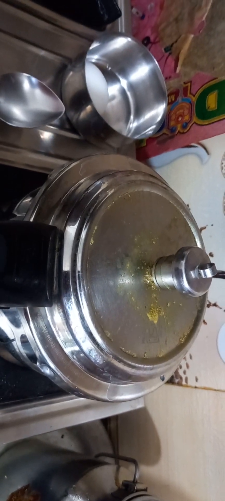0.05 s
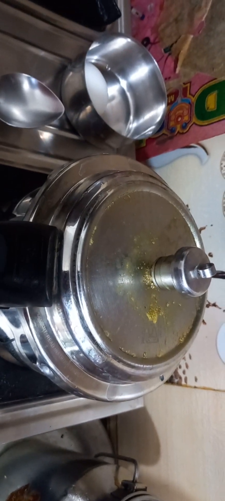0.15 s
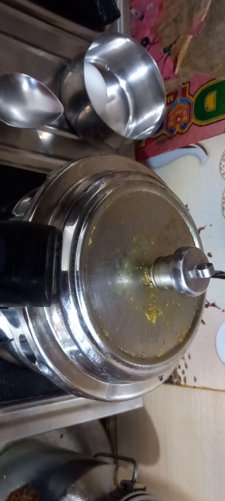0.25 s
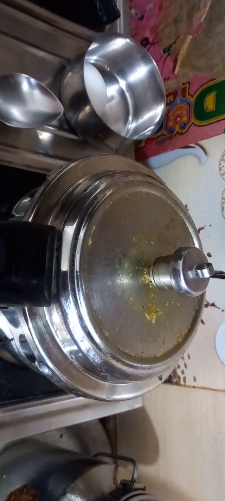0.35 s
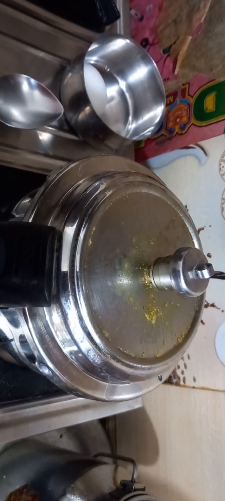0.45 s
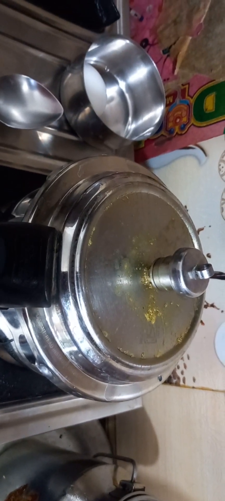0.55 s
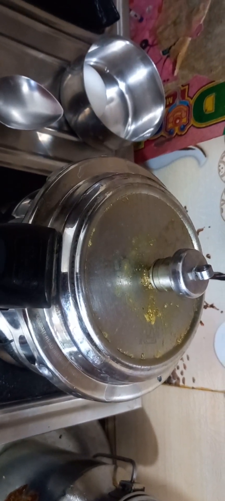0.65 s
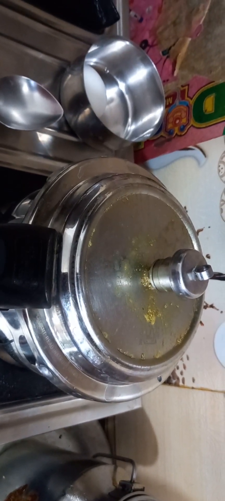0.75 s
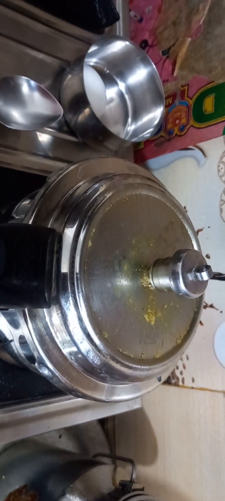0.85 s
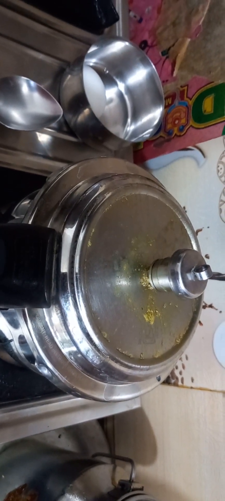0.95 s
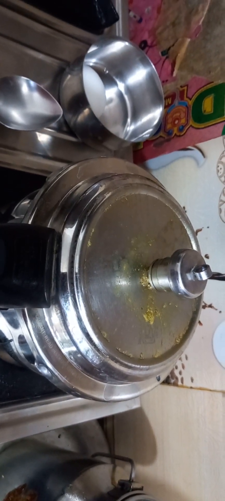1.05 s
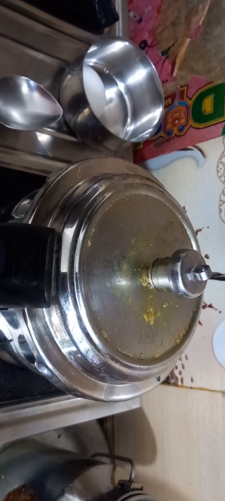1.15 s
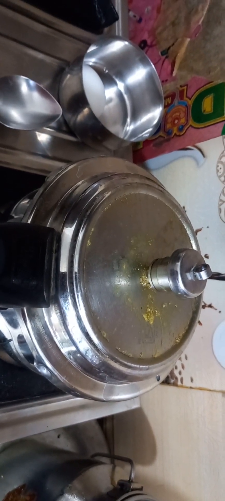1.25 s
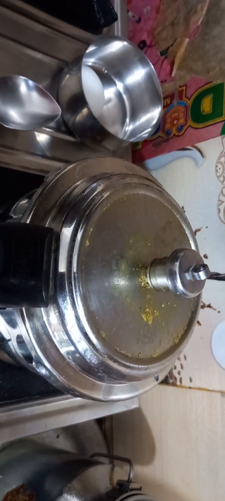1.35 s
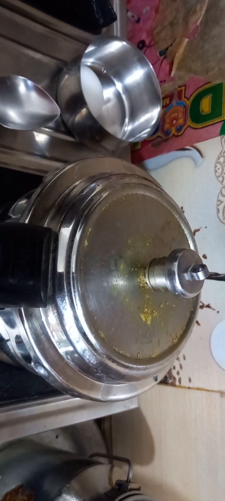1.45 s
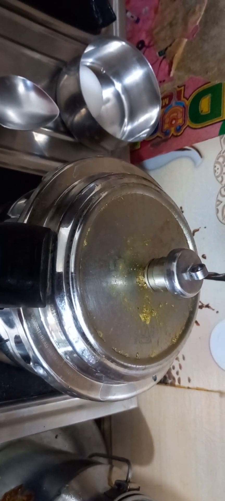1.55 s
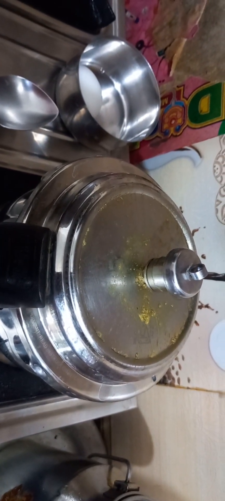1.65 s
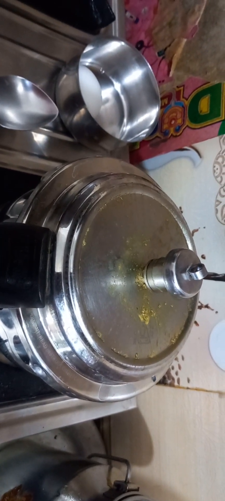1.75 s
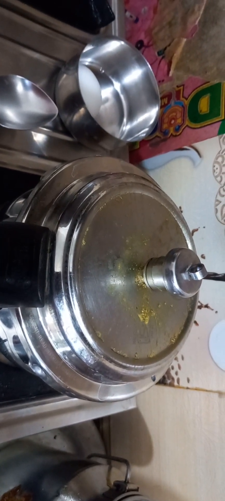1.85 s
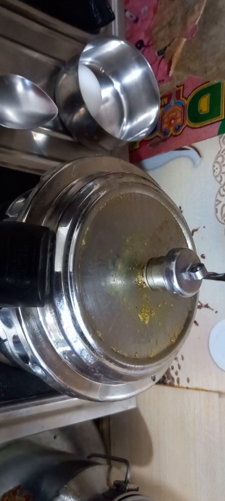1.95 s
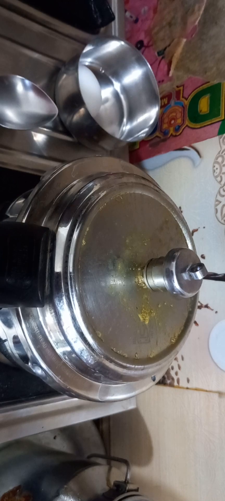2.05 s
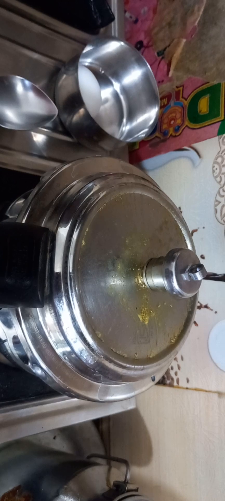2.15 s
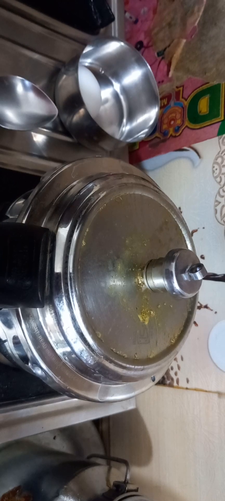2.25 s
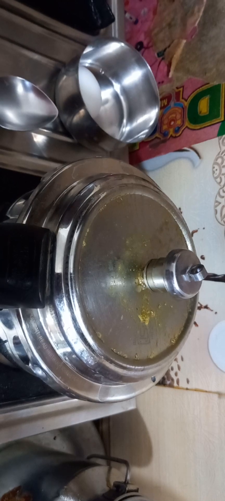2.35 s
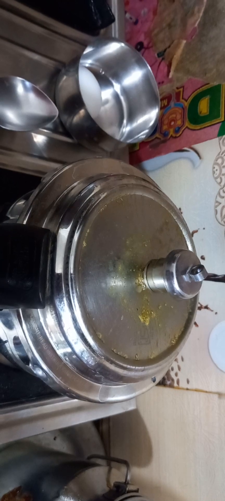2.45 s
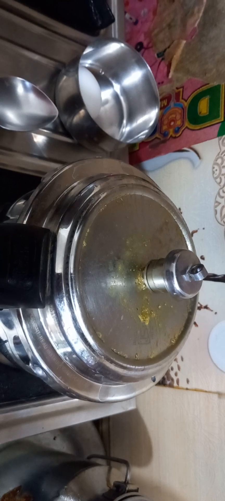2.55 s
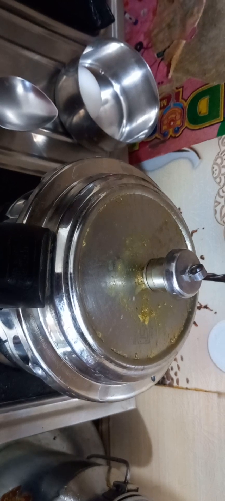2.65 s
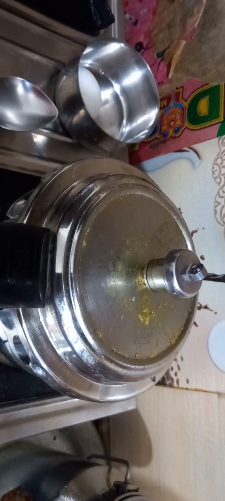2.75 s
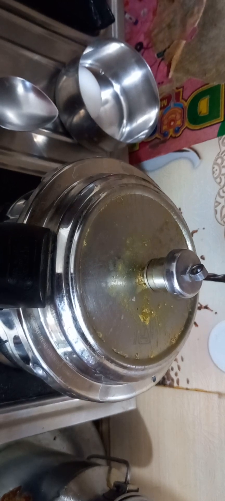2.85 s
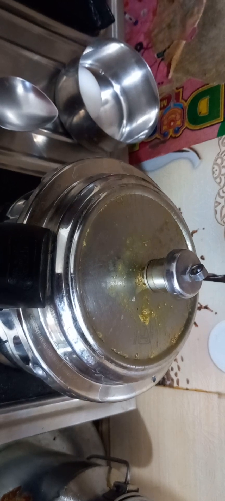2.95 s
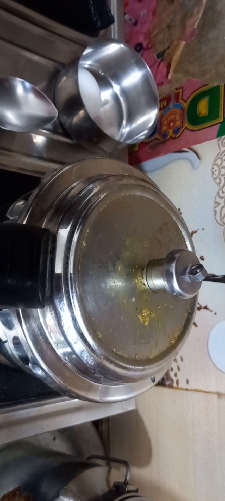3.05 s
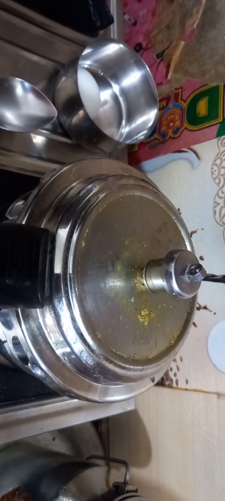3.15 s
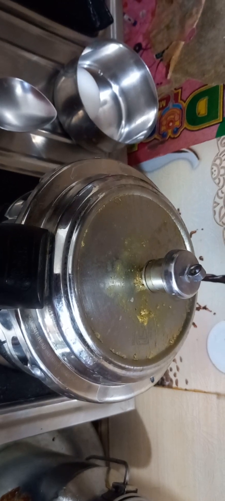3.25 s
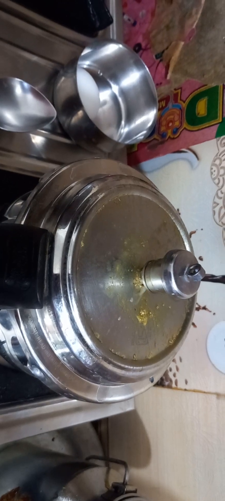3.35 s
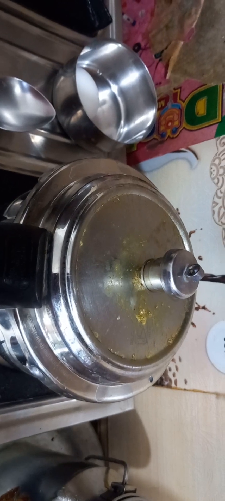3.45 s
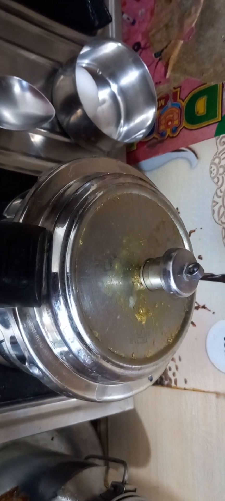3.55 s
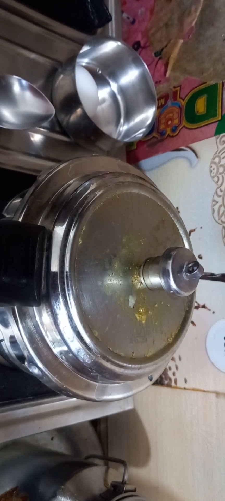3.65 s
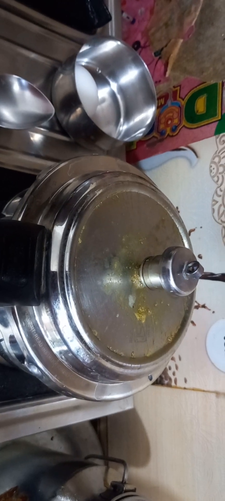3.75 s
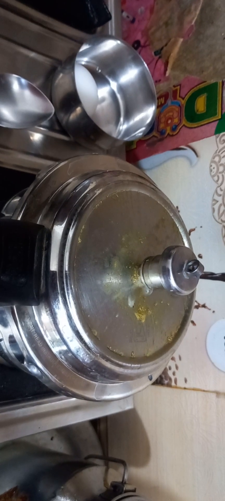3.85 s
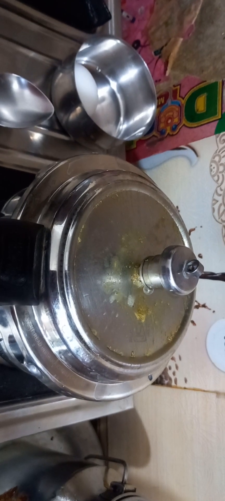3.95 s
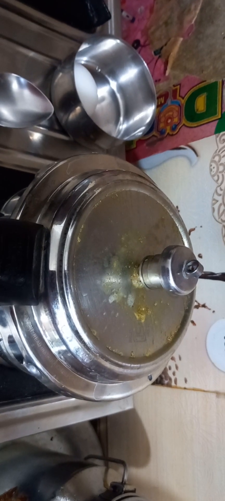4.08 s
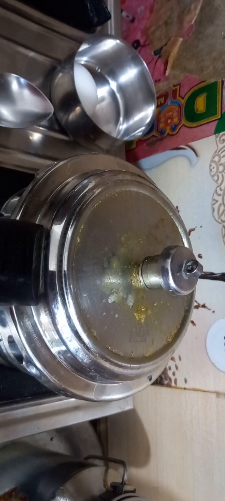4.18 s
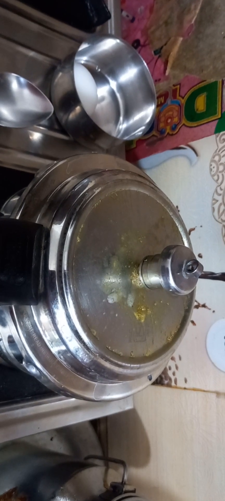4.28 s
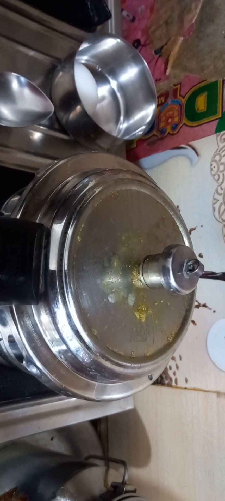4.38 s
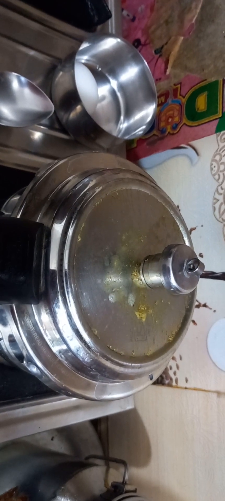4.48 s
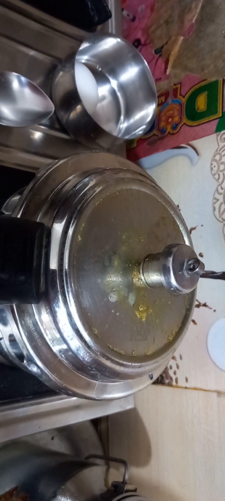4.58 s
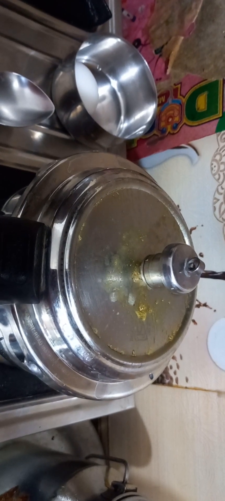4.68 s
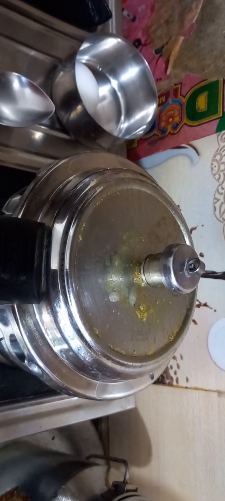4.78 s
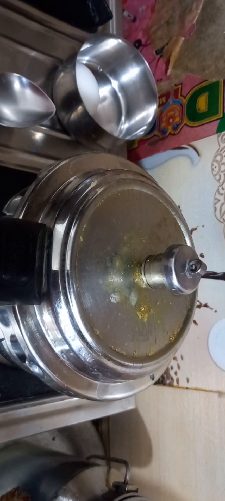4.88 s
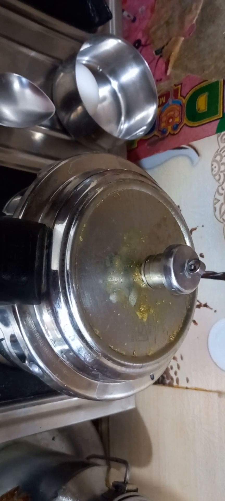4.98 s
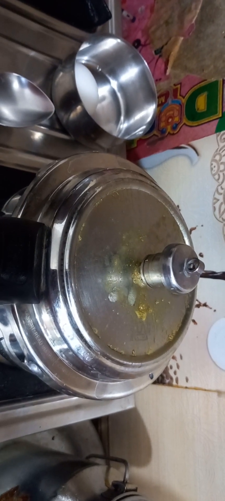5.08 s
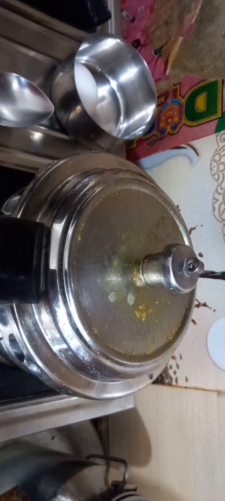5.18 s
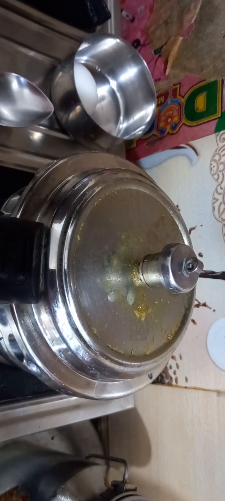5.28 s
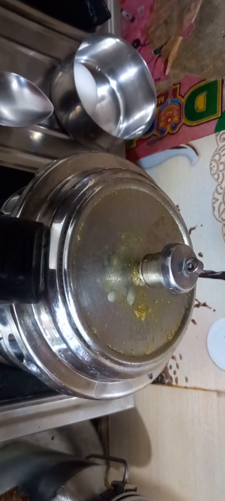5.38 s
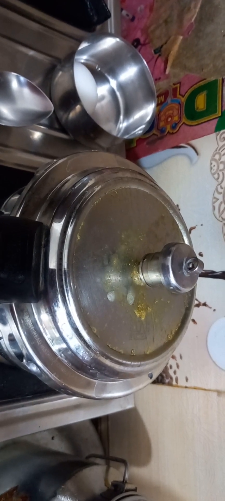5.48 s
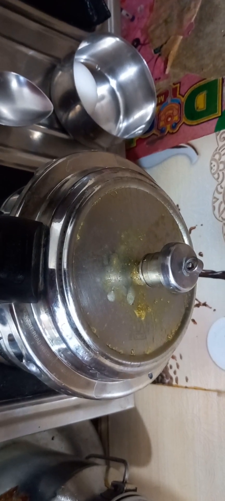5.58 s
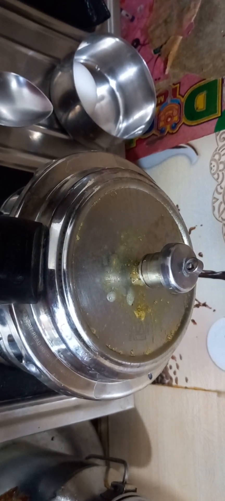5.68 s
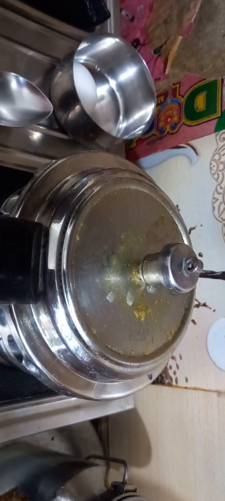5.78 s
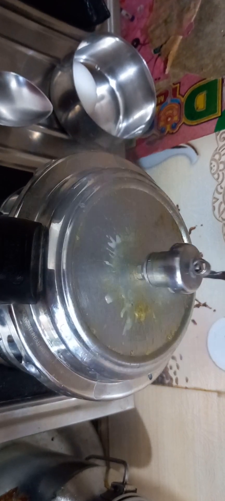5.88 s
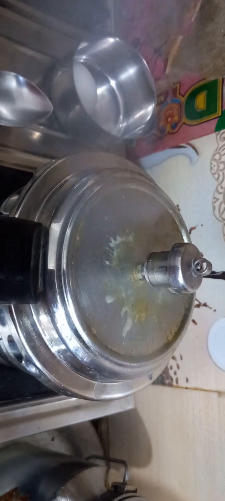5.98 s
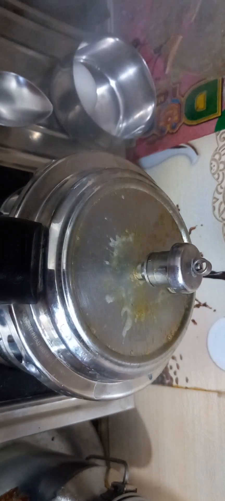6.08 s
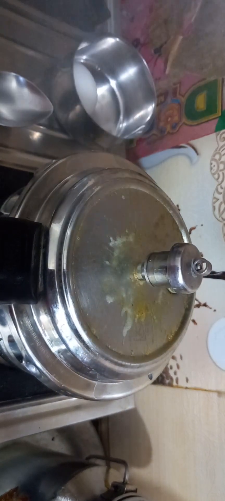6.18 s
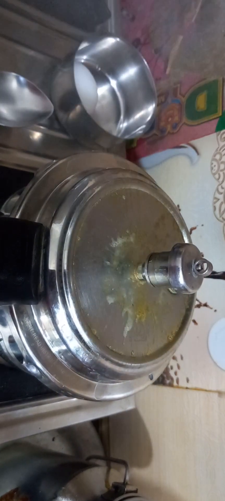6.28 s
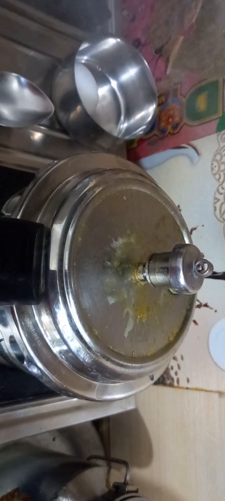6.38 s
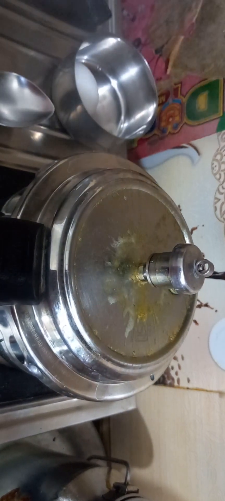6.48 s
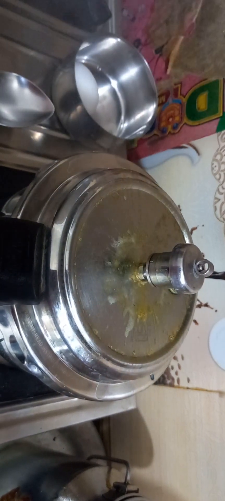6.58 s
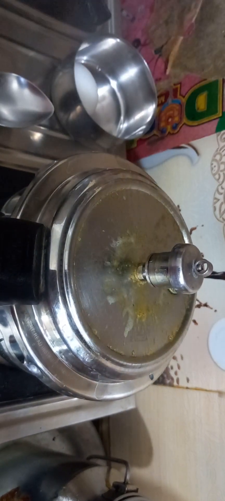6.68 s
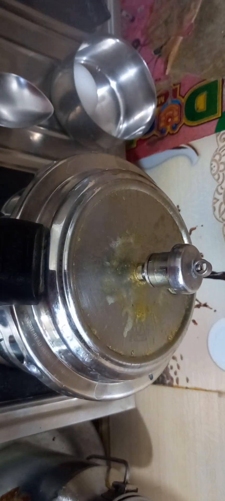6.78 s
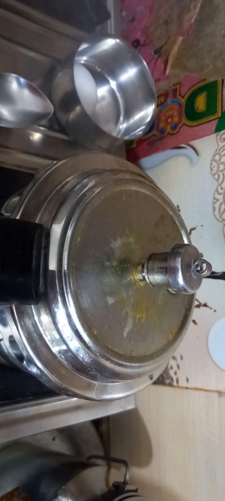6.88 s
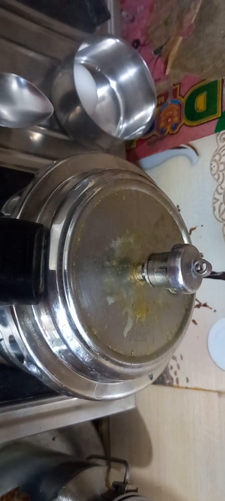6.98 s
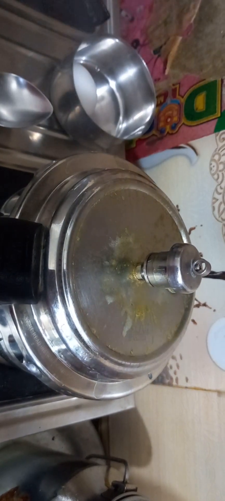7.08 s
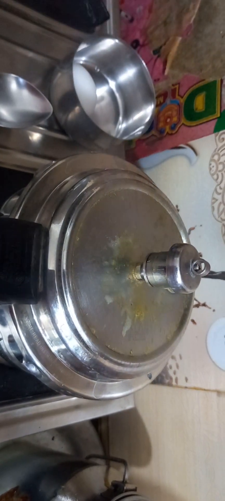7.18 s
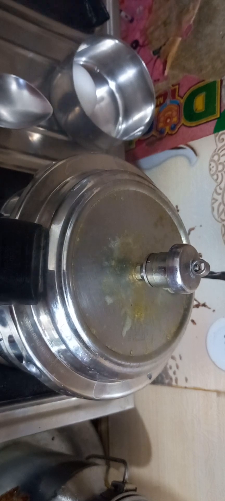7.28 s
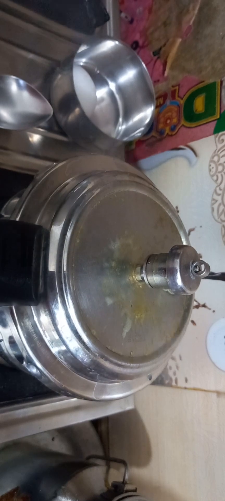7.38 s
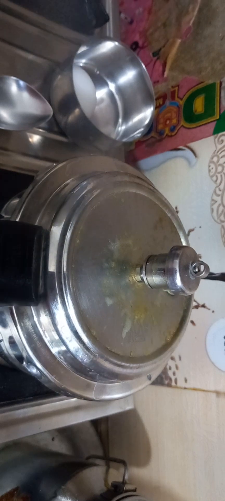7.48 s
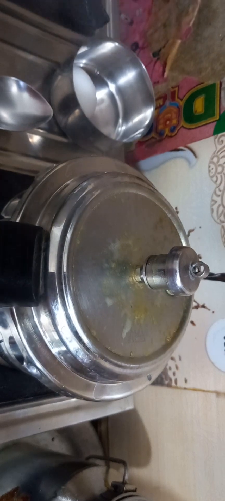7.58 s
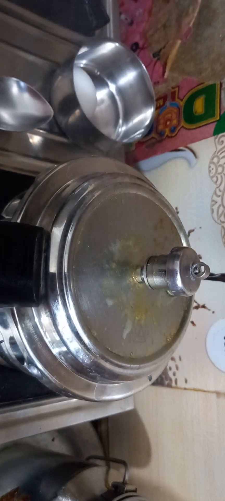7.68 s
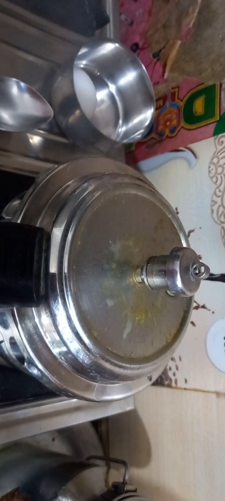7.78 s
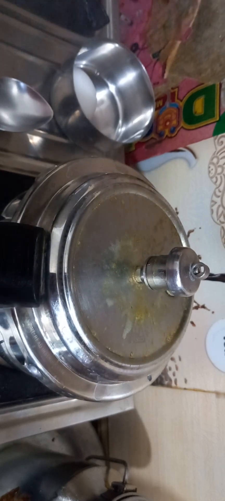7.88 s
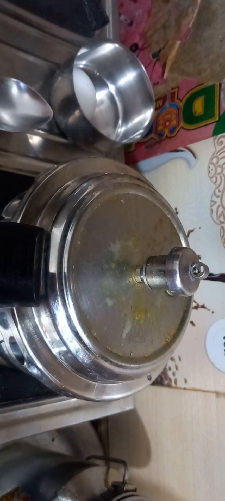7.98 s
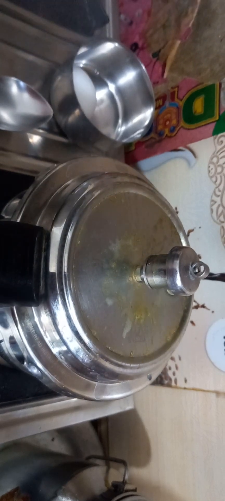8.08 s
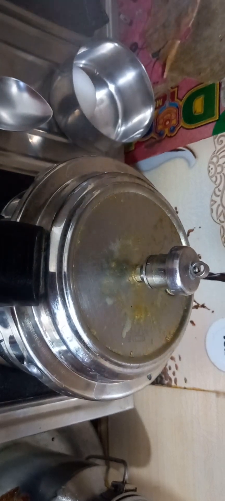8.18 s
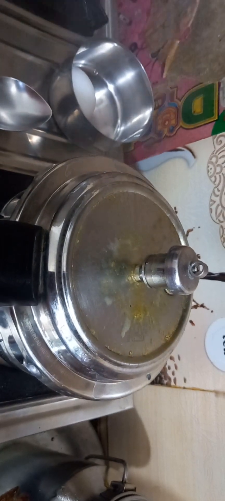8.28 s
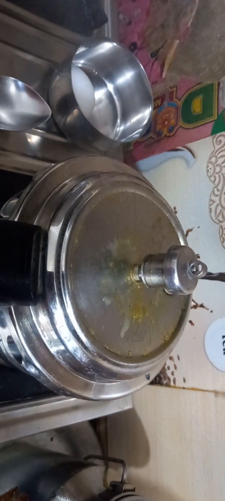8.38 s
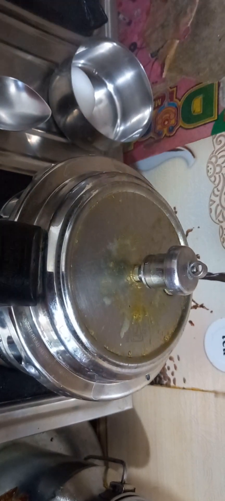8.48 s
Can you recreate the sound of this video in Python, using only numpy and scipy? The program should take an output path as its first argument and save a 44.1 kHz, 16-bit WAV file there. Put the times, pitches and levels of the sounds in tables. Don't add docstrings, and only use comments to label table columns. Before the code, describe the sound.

A pressure cooker spits bright, uneven spurts of steam over a low burner rumble, then bursts into a loud steady roaring hiss with dense crackle.

```python
import sys
import numpy as np
from scipy import signal
from scipy.fft import rfft, irfft, next_fast_len
from scipy.io import wavfile
from scipy.ndimage import uniform_filter1d, map_coordinates

SR = 44100
rng = np.random.default_rng(int(sys.argv[2]) if len(sys.argv) > 2 else 0)


def transcribe(u):
    v = np.clip(np.atleast_2d(u).T, -1, 1)
    q = np.round(v * 32767).astype(np.int16)
    wavfile.write(sys.argv[1], SR, q)


def voltage_ratio(decibels):
    exponent = np.asarray(decibels, float) / 20
    return 10 ** exponent


N = 376173
TIME = np.arange(N) / SR


def flow():
    # (peak time [s], peak level [dB], opening [s], closing [s])
    spurts = [(0.428, -33, 0.061, 0.059), (0.745, -21.5, 0.209, 0.062), (0.877, -29.0, 0.08, 0.076),
              (1.064, -21, 0.09, 0.076), (1.781, -21.5, 0.179, 0.069), (1.894, -31, 0.062, 0.06),
              (2.095, -24, 0.121, 0.078), (2.301, -22, 0.11, 0.071), (2.45, -27.4, 0.081, 0.064),
              (2.624, -22, 0.099, 0.088), (2.782, -25, 0.076, 0.092), (2.911, -32, 0.048, 0.088),
              (3.174, -21.5, 0.143, 0.067), (3.392, -21, 0.128, 0.074), (3.501, -31.8, 0.056, 0.073),
              (3.689, -24, 0.092, 0.063), (3.889, -20, 0.11, 0.146), (4.093, -38.5, 0.073, 0.07),
              (4.217, -40.1, 0.077, 0.03), (4.526, -28, 0.195, 0.06), (4.726, -23.5, 0.11, 0.081),
              (4.827, -36.2, 0.045, 0.067), (4.965, -32.4, 0.062, 0.089), (5.228, -23, 0.18, 0.055),
              (5.368, -22.5, 0.081, 0.07), (5.542, -27, 0.12, 0.13)]
    # (time [s], level [dB])
    jolts = [
        (0.765, -29),
        (3.9, -23),
        (4.755, -27.5),
        (5.2, -26.5),
    ]
    # (start [s], end [s], level [dB])
    seeps = [
        (-0.1, 0.61, -32),
        (1.178, 1.61, -35),
        (2.96, 3.12, -35.71),
        (4.26, 4.35, -40.62),
    ]
    # (time [s], flow [dB])
    lift = [
        (5.6, -70),
        (5.68, -39),
        (5.75, -25),
        (5.8, -20),
        (5.87, -21),
        (5.9, -18),
        (5.95, -23),
        (6.0, -22),
        (8.53, -23),
    ]
    sealed_db, jolt_s, seep_edge_s = -64, 0.034, 0.057
    span_db = 15.5

    power = voltage_ratio(2 * sealed_db) + voltage_ratio(2 * curves(lift)[0])
    for peak_s, db, opening, closing in spurts + [(s, db, jolt_s, jolt_s) for s, db in jolts]:
        distance = (TIME - peak_s) / np.where(TIME < peak_s, opening, closing)
        power += voltage_ratio(2 * (db - span_db * distance ** 2))
    flutter_db = -0.2 * wobble(14)
    for start, end, db in seeps:
        outside = np.maximum(np.maximum(start - TIME, TIME - end), 0) / seep_edge_s
        power += voltage_ratio(2 * (db + flutter_db - span_db * outside ** 2))
    return 10 * np.log10(power)


def steam():
    # (frequency [Hz], density [dB per Hz])
    spurt_colour = [(1500, -53), (2500, -22), (3150, -17.5), (3700, -12), (4400, -14), (5300, -0.5),
                    (7200, -0.5), (8300, -3), (9200, -1), (11000, -4), (13300, 1.5), (14300, -1),
                    (15000, -7), (15900, -7)]
    # (frequency [Hz], density [dB per Hz])
    blast_colour = [(2650, -12), (4500, -7.5), (5100, -2.5), (6300, -2), (7300, 0.5), (8300, 0),
                    (9400, 0.5), (11000, 4.5), (12800, 1.5), (14300, 3), (15100, -1), (15900, -3)]
    # (frequency [Hz], density [dB per Hz])
    lid_colour = [(150, -15), (300, -3), (700, -5), (1200, -4), (2500, 2.5), (3500, 1.5), (4600, 3.5),
                  (6000, -22)]
    # (frequency [Hz], width [Hz], level over the lid hiss [dB])
    tube = [(1558, 120, 8.5), (2077, 39, 10), (1110, 94, -3), (1920, 98, -0.5)]
    # (frequency [Hz], width [Hz], level [dB])
    dips = [(3150, 180, -3), (12360, 440, -1)]
    # (frequency [Hz], width [Hz], level [dB])
    late_ring = [(10800, 1300, -1.5)]

    jet = filtered(at_ports(patchy(1.03), strength=0.67), chamber)
    jet = signal.fftconvolve(jet, glints(-14, decay_s=0.12), axes=1)[:, :N]
    hiss_db = flow() + 1.08
    lid_db = -43 + 0.78 * (hiss_db + 24.5)

    spurt = unit(filtered(jet, colour(spurt_colour, dips)))
    top = filtered(spurt, lambda hz: 1 / (1 + (10500 / (hz + 1)) ** 4))
    spurt = spurt + (voltage_ratio(0.11 * (hiss_db + 23.5)) - 1) * top

    blast = unit(filtered(jet, colour(blast_colour)))
    blast = blast * voltage_ratio(np.array([[0.3], [-0.6]]) * np.clip(TIME - 7, 0, 2))
    sharp_db, sharp_fade_s, sharp_hz = 2.5, 0.67, 11800
    edge = filtered(blast, lambda hz: 1 / (1 + (sharp_hz / (hz + 1)) ** 12))
    sharpness = 2 * np.exp(-np.clip(TIME - 5.9, 0, None) / sharp_fade_s) - 0.5
    blast = blast + (voltage_ratio(sharp_db * sharpness) - 1) * edge
    filled = np.clip((TIME - 6.8) / 1.1, 0, 1)
    hollow = filtered(blast, colour([(100, 0)], late_ring))
    blast = filled * blast + (1 - filled) * hollow

    lid = unit(filtered(at_ports(patchy(0.95), strength=0.63), colour(lid_colour, tube + dips)))
    lifted = np.clip((TIME - 5.8) / 0.39, 0, 1)
    flutter_db = 0.17 * wobble(14)
    hiss = voltage_ratio(hiss_db + flutter_db + 3) * ((1 - lifted) * spurt + lifted * blast)
    return hiss + (TIME < 5.92) * voltage_ratio(lid_db + flutter_db + 7) * lid


def chamber(hz):
    # (frequency [Hz], width [Hz], left level over the jet [dB], right level over the jet [dB])
    resonances = [(4750, 250, 0, 2), (5000, 100, 0, 2), (5460, 130, 0, 4), (5930, 70, 1, 3),
                  (7300, 300, 2, 3), (8110, 120, 4, 0), (8670, 150, 3, 0), (9130, 250, 0, 1),
                  (10900, 200, 1, 0), (13000, 200, 3, 1), (15550, 150, 2, 1)]
    peaks_db = 0
    for centre, width, left_db, right_db in resonances:
        peaks_db = peaks_db + np.array([[left_db], [right_db]]) / (1 + (2 * (hz - centre) / width) ** 2)
    return voltage_ratio(peaks_db)


def glints(level_db, decay_s):
    t = np.arange(SR // 50) / SR
    echo = unit(rng.standard_normal((2, len(t))) * voltage_ratio(-60 * t / decay_s))
    echo *= voltage_ratio(level_db) / np.sqrt(len(t))
    echo[:, 0] = 1
    return echo / np.linalg.norm(echo, axis=1, keepdims=True)


def at_ports(pair, strength):
    # (lag [ms], gain [ratio])
    paths = [(.115, .32), (.36, -.32), (.565, .2), (1.66, .18), (1.82, .15), (2.15, -.22), (2.21, .17)]
    m = next_fast_len(N + 8192)
    hz = np.fft.rfftfreq(m, 1 / SR)
    link = strength * sum(gain * np.exp(-2j * np.pi * hz * ms / 1000) for ms, gain in paths)
    link = link / np.maximum(1, np.abs(link))
    left, other = rfft(pair, m)
    right = link * left + np.sqrt(np.abs(1 - np.abs(link) ** 2)) * other
    return irfft([left, right], m)[:, :N]


def overload():
    # (frequency [Hz], density [dB per Hz])
    crackle_colour = [(15, -60), (25, -38), (86, -0.5), (133, 1), (172, -4), (253, 1), (1050, -9.5),
                      (1350, -10), (1550, -11.5), (1820, -12), (2090, -10.5), (2400, -13.5), (6000, -18.5),
                      (7800, -40), (13200, -120)]
    # (frequency [Hz], width [Hz], level [dB])
    tube_in_crackle = [(1564, 190, 5.9), (2060, 44, 6.1)]
    # (time [s], level [dB], length [s])
    puffs = [
        (1.06, -47, .04),
        (1.79, -42, .04),
        (2.3, -50, .04),
        (3.17, -46, .04),
        (3.9, -33.5, .03),
        (4.72, -44, .04),
        (5.2, -49, .04),
        (5.885, -36, .03),
        (5.82, -48, .05),
    ]
    # (time [s], left level [dB], right level [dB])
    first_clicks = [
        (5.899, -12, 1),
        (5.918, -15, -4),
        (5.921, 6.5, -10),
        (5.931, 7, -13),
    ]

    since = np.clip(TIME - 5.9, 0, None)
    level_db = -20.5 - 1.03 * since
    lean_db = 2.5 + 1.67 * since + 0.8 * wobble(7)
    left_clumps_db = 3 * wobble(60) + 1.5 * wobble(25)
    right_clumps_db = 3 * wobble(60) + (2 + 1.2 * np.clip(TIME - 6, 0, 2)) * wobble(30)
    clumps = voltage_ratio(np.array([left_clumps_db, right_clumps_db]))
    chance = 2500 / SR
    struck = rng.random((2, N)) < chance * clumps
    clicks = rng.standard_normal((2, N)) * struck / np.sqrt(chance)
    grit = rng.standard_normal((2, N))

    settling = np.clip((TIME - 5.9) / 0.047, 0, 1)
    port_db = level_db + 5 + np.array([[0.5], [-0.5]]) * (lean_db - 3)
    source = settling * voltage_ratio(port_db) * (clicks + 0.58 * grit)
    source += grit * sum(voltage_ratio(db) * np.exp(-((TIME - s) / length) ** 2) for s, db, length in puffs)
    for s, left_db, right_db in first_clicks:
        start = round(s * SR)
        source[:, start:start + 48] += voltage_ratio(np.array([[left_db], [right_db]]) - 18.5) * np.hanning(48)

    gain = colour(crackle_colour, tube_in_crackle)(np.fft.rfftfreq(8192, 1 / SR))
    cepstrum = irfft(np.log(np.maximum(gain, 1e-4)))
    cepstrum[1:4096] *= 2
    cepstrum[4097:] = 0
    ring = irfft(np.exp(rfft(cepstrum)))[None, :4096]
    return signal.fftconvolve(source, ring / np.linalg.norm(ring), axes=1)[:, :N]


def flame():
    # (frequency [Hz], density [dB per Hz])
    rumble_colour = [(40, -26), (70, -23), (90, -5), (108, 0), (125, -6), (160, -25), (200, -5.5),
                     (240, -22), (300, -54)]
    # (frequency [Hz], pitch wander [Hz], level over the rumble [dB])
    drone = [(97, 1.5, -0.5), (110.5, 2.87, -5.5), (121.2, 2.08, -3)]
    # (time [s], level [dB])
    burner = [
        (0.0, -54),
        (0.5, -53),
        (1.5, -51),
        (2.5, -51),
        (3.7, -49.5),
        (4.8, -49),
        (5.3, -43),
        (5.85, -41.5),
    ]
    burner_db = curves(burner)[0] + 1.5 * wobble(4)
    rumble = voltage_ratio(-4.0) * nearly_mono(rumble_colour, alike=0.72)
    return voltage_ratio(burner_db) * (rumble + tones(drone, tremble_db=2.5))


def kitchen():
    # (frequency [Hz], density [dB per Hz])
    room_colour = [(15, -61), (25, -38), (111, 3.5), (160, -5.5), (401, -5.5), (540, -8), (1100, -16.5),
                   (1520, -23), (2340, -28), (4770, -21), (6000, -12.5), (7800, -38), (13200, -120)]
    # (frequency [Hz], pitch wander [Hz], level over the room noise [dB])
    hum = [(198, 8, -11), (146, 7, -11)]
    duck_s, duck_db, duck_return_s = 3.95, 3, 1.2
    level_db = -51 - 0.52 * TIME + 4 * np.exp(-TIME / 0.42)
    level_db -= duck_db * (TIME > duck_s) * np.exp(-np.abs(TIME - duck_s) / duck_return_s)
    room = nearly_mono(room_colour, alike=0.8) + tones(hum, tremble_db=3.5)
    return voltage_ratio(level_db + 4 + 0.5 * wobble(4.68)) * room


def surroundings():
    return (flame() + kitchen()) * np.clip((6.05 - TIME) / 0.14, 0.2, 1)


def hoots():
    # (start [s], length [s], frequency [Hz], level [dB])
    calls = [
        (.16, .08, 352, -44),
        (.25, .07, 350, -47),
        (.37, .08, 350, -43),
        (.68, .06, 1000, -50),
        (.67, .07, 810, -52),
        (1.88, .14, 452, -50),
        (2.0, .2, 450, -57),
    ]
    out, drift, tremble = np.zeros(N), wobble(40.4), wobble(39.2)
    for start, length, hz, db in calls:
        span = slice(round(start * SR), round((start + length) * SR))
        swell = np.sin(np.pi * np.clip((TIME[span] - start) / length, 0, 1)) ** 0.23
        phase = 2 * np.pi * np.cumsum(hz + 7 * drift[span]) / SR
        out[span] += voltage_ratio(db + 2.8 * tremble[span]) * swell * np.sin(phase)
    return out


def nearly_mono(spectrum, alike):
    mid, side = filtered(patchy(1.9), colour(spectrum))
    turn = np.arccos(np.clip(alike, 0, 1)) / 2
    mid, side = np.cos(turn) * mid, np.sin(turn) * side
    return unit(np.array([mid + side, mid - side]))


def tones(lines, tremble_db):
    total = 0
    for hz, wander, db in lines:
        phase = 2 * np.pi * np.cumsum(hz + wander * wobble(10)) / SR
        total = total + voltage_ratio(db + tremble_db * wobble(5)) * np.sin(phase)
    return total


def patchy(patchy_db):
    z = signal.stft(rng.standard_normal((2, N)), nperseg=512)[2]
    field = uniform_filter1d(rng.standard_normal(z.shape[1:]), 6, 0)
    field = uniform_filter1d(field, 10, 1)
    return signal.istft(z * voltage_ratio(patchy_db * field / field.std()), nperseg=512)[1][:, :N]


def unit(x):
    return x / np.sqrt(np.mean(x ** 2, axis=-1, keepdims=True) + 1e-20)


def along(points, hz):
    f, v = np.transpose(points)
    return np.interp(np.log(hz + 1), np.log(f + 1), v)


def curves(rows):
    s, *cols = np.transpose(rows)
    return [np.interp(TIME, s, c) for c in cols]


def wobble(rate):
    return map_coordinates(rng.standard_normal(int(N * rate / SR) + 4), [TIME * rate])


def filtered(x, response):
    m = next_fast_len(N + 8192)
    return irfft(rfft(x, m) * response(np.fft.rfftfreq(m, 1 / SR)), m)[..., :N]


def colour(points, modes=()):
    def gain(hz):
        peaks_db = sum(db / (1 + (2 * (hz - centre) / width) ** 2) for centre, width, db in modes)
        return voltage_ratio(along(points, hz) + peaks_db)
    return gain


def scene():
    return steam() + overload() + surroundings() + hoots()


def roll_off(x):
    return signal.sosfilt(signal.butter(12, 17090, fs=SR, output="sos"), x)


def record(dry):
    # (frequency [Hz], level [dB])
    port_balance = [(60, -2), (200, 0), (700, 2.5), (2500, 2), (4400, 1.7), (5400, -1), (7400, 0),
                    (8300, 7.5), (9300, -1), (11400, 2), (13300, .5), (14200, -.5), (15000, 1.5),
                    (15800, 1)]

    def ports(hz):
        bass_cut = 1 / (1 + (34 / (hz + 1)) ** 4)
        return voltage_ratio(np.array([[0.5], [-0.5]]) * along(port_balance, hz)) * bass_cut

    x = filtered(dry, ports)
    x = x / (1 + np.abs(x / 0.9) ** 5) ** (1 / 5)
    x = filtered(x, lambda hz: hz < 15760)
    return roll_off(x)


dry = scene()
out = record(dry)
transcribe(out)
```